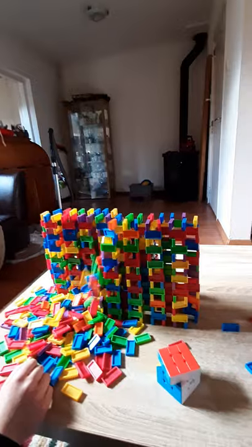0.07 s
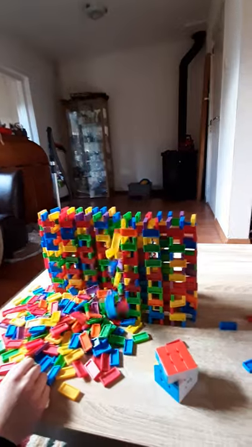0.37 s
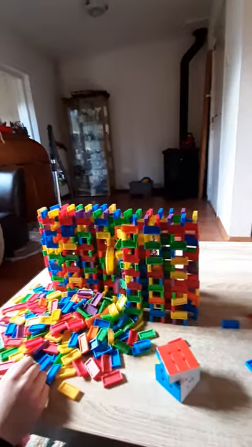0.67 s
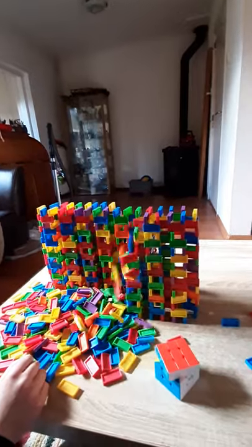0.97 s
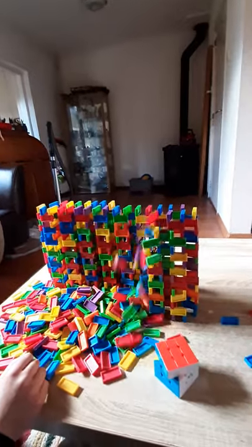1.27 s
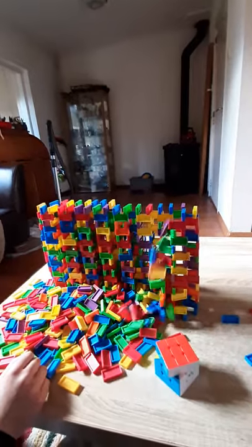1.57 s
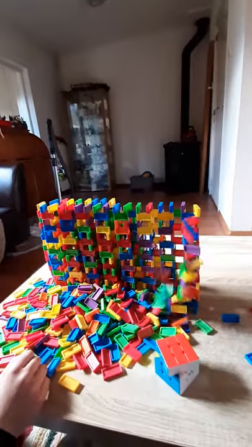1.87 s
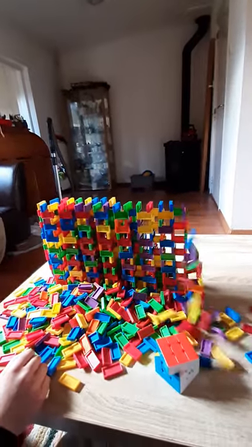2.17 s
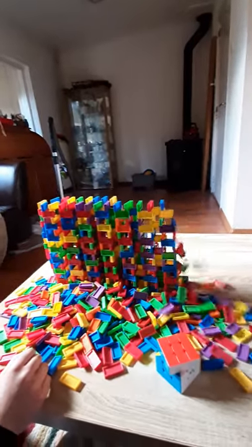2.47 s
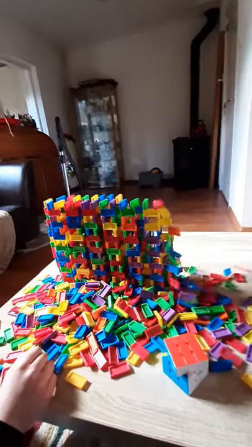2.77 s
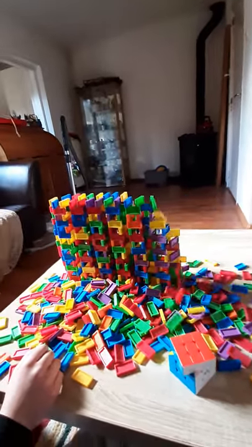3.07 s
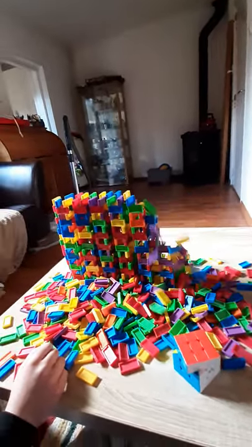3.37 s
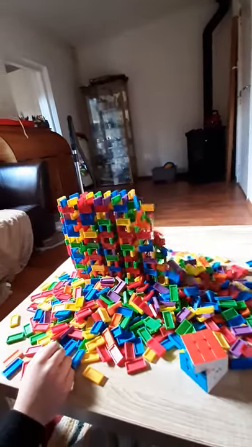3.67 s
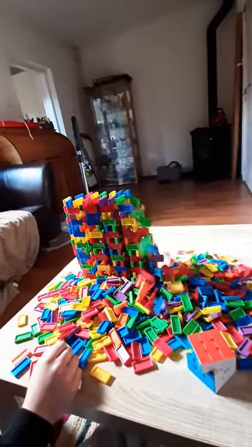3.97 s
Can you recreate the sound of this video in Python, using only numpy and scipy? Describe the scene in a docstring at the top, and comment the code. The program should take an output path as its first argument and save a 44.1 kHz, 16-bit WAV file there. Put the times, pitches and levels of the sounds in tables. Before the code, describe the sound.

Small plastic dominoes clatter close by for the whole four seconds, falling in surges of dense, bright clicks with loud clacks and pattering knocks on a wooden table. A few low thumps reach the microphone in the first 2.3 seconds. The clatter eases briefly around 3.2 seconds, then swells again at 3.5 and runs on. The living room adds a short echo.

```python
"""Small plastic dominoes tumble close by, as a wall of them falls column by column on a wooden table.
The pieces click against each other in dense runs; each click is a crack and a brief ring near 5 kHz.
Hard hits stand out as loud clacks, and pieces landing on the wood patter and knock.
A few low thumps reach the microphone, and a living room adds a short echo and a faint rumble."""
import sys
import numpy as np
from scipy import signal
from scipy.fft import rfft, irfft
from scipy.io import wavfile

SR = 44100
rng = np.random.default_rng(int(sys.argv[2]) if len(sys.argv) > 2 else 0)


def wav_out(sig):
    """Save sig, one row per channel (or a flat mono array), as 16-bit PCM at SR to the path in sys.argv[1]."""
    wavfile.write(sys.argv[1], SR, np.round(np.clip(np.atleast_2d(sig).T, -1, 1) * 32767).astype(np.int16))


N = 176400  # 4 seconds
PLASTIC_LIKENESS, WOOD_LIKENESS = 0.4, 0.93  # how alike left and right are, from 0 to 1

# Table levels are relative: the code adds its own gains. A fade_s is the time to die away by 60 dB.
# How hard the wall falls as columns give way. Columns: time_s, clatter_db, treble_db, patter_db
COLLAPSE = [(0.0, -17.5, -2, -30.5), (0.13, -25, -26, -36.5), (0.18, -17, -7, -32), (0.44, -20, -13, -30.5),
            (0.54, -25, -12, -38.5), (0.62, -17, -8, -31), (0.68, -30, -17, -38.5), (0.88, -26, -5.5, -34),
            (0.93, -16.5, -17, -36), (1.0, -24.5, -9, -33.5), (1.12, -19, -15.5, -35.5),
            (1.25, -21.5, -14, -36), (1.3, -18.5, -8.5, -35), (1.56, -16.5, -9.5, -28.5),
            (1.66, -28.5, -17.5, -36.5), (1.76, -17.5, -9.5, -29), (1.95, -16.5, -7.5, -32.5),
            (2.02, -20.5, -8.5, -32.5), (2.17, -19, -12, -32.5), (2.25, -23, -11, -32),
            (2.32, -15.5, -8, -31.5), (2.52, -22, -7.5, -32.5), (3.08, -20.5, -11.5, -34.5),
            (3.19, -28.5, -10.5, -37.5), (3.3, -30.5, -14, -38.5), (3.44, -20, -9.5, -29.5),
            (3.52, -16, -9, -26), (4.0, -19, -11, -29.5)]

def clatter(count=330, level_db=-0.74, rattle_s=0.012, free_fall_s=0.018, free_fall_db=-3.5):
    """Many pieces tumble over each other; each rattles briefly, overlapping its neighbours."""
    out = np.zeros((2, N))
    pieces = [domino(crack_db=0.3, crack_fade_s=0.021) for _ in range(count)]
    times, gain, hits = random_hits(column=1, per_s=440, spread_db=1.5)
    flicker_db = 2.5 * np.minimum(rng.standard_normal(len(times)), 1)
    brightness = amp(collapse_at(times, column=2) + 10 + flicker_db)
    which = (times / rattle_s + 3 * rng.random(len(times))).astype(int) % count
    # Loose pieces are in free fall just before a loud clack, so the clatter eases.
    falling = np.any([(times > s - free_fall_s) & (times < s) for s, _, _ in CLACKS], axis=0)
    gain *= amp(free_fall_db * falling)
    for k in hits:
        body, treble = pieces[which[k]]
        add(out, times[k], gain[k] * (body + brightness[k] * treble))
    return amp(level_db) * out


def random_hits(column, per_s, spread_db, slots=6000):
    """A harder fall brings more and stronger hits. Gives times, gains and the slots that sound."""
    times = (np.arange(slots) + rng.random(slots)) / slots * N / SR
    level = amp(collapse_at(times, column))
    chance = np.minimum(per_s * N / SR / slots * (level / level.mean()) ** 0.6, 1)
    strength = amp(spread_db * np.minimum(rng.standard_normal(slots), 1.6))
    gain = level * strength / np.sqrt(np.mean(strength ** 2) * chance * slots / N)
    return times, gain, np.flatnonzero(rng.random(slots) < chance)


# The tones a domino rings with. Columns: pitch_hz, level_db, fade_s, pitch_scatter_fraction
DOMINO_TONES = [(4595, -4, 0.048, 0.01), (4840, -1.5, 0.04, .008), (4997, -0.5, 0.038, 0.0098),
                (6118, -6.5, 0.043, 0.0088), (7020, -15, 0.069, 0.0234), (7550, -10.5, 0.037, 0.0226),
                (10380, -14, 0.024, 0.026), (10855, -13, 0.036, 0.014), (12190, -16.5, 0.016, 0.017),
                (13160, -17.5, 0.021, 0.022), (15340, -9.5, 0.007, 0.049)]
# The tone colour of plastic cracking against plastic. Columns: pitch_hz, level_db
CRACK_COLOUR = [(30, -41), (300, -4), (2000, -13), (2850, -15), (3400, -1), (4100, 1), (5400, 5.5),
                (8000, 2), (8600, -4.5), (9500, -12.5), (10500, -2.5), (11500, -9), (15700, -7.5)]

def domino(crack_db, crack_fade_s, size=2400, tone_spread_db=6, treble_hz=8600):
    """One click: the hit makes a noisy crack and sets the piece ringing. Gives body and treble."""
    t = np.arange(size) / SR
    hz, db, fade_s, scatter = np.transpose(DOMINO_TONES)[:, :, None]
    detune, strength = rng.standard_normal((2, len(hz), 1))
    tones = np.exp(2j * np.pi * hz * (1 + scatter * detune) * t) * fade(t, fade_s)
    tones *= amp(db + tone_spread_db * strength) / np.linalg.norm(tones.real, axis=1, keepdims=True)
    phases = np.exp(2j * np.pi * rng.random((2, len(hz), 1)))
    ring = (phases * tones).real.sum(1)
    burst = rng.standard_normal((2, size)) * fade(t, crack_fade_s)
    crack = unit(colour(burst, CRACK_COLOUR))
    click = unit(stereo(ring + amp(crack_db) * crack, PLASTIC_LIKENESS))
    keep_highs = 1 / (1 + (treble_hz / (np.fft.rfftfreq(size, 1 / SR) + 1)) ** 10)
    treble = irfft(rfft(click) * keep_highs, size)
    treble *= t < t[-1] / 2
    return click - treble, treble


# Loud hits of piece on piece. Columns: start_s, level_db, treble_db
CLACKS = [(0.032, -12, -10), (0.1477, -12, -14), (0.1644, -12.5, -4.5), (0.1962, -8.5, -26),
          (0.2303, -14.5, -2.5), (0.2813, -11.5, -25), (0.3804, -11.5, -7.5), (0.3974, -9, -10),
          (0.4179, -10.5, -9), (0.4657, -6, -7.5), (0.4881, -14, -5), (0.519, -11.5, -12),
          (0.5945, -13, -6), (0.7128, -16, -21), (0.7351, -17, -11), (0.7673, -14.5, -12.0),
          (0.7894, -15.5, -5.5), (0.8222, -19.5, -5), (0.8643, -15, -15.5), (0.9042, -13.5, 2.5),
          (0.9722, -15.5, -3), (1.0065, -18.5, -15), (1.0568, -8, -4), (1.1017, -11, -10),
          (1.1704, -9, -4.5), (1.1894, -11.5, -11), (1.238, -19, -19), (1.2685, -14, -6),
          (1.2891, -10.5, -7), (1.39, -11, -10), (1.431, -7.5, -7), (1.5394, -19, -11), (1.7109, -16, -2),
          (1.7305, -10.5, -10), (1.7986, -13, -6), (1.8608, -16, -16), (1.8816, -9.5, -30),
          (1.9041, -9, -22), (1.9138, -11, -18), (1.978, -14.5, -7), (2.0438, -24, -5), (2.083, -15, 1.5),
          (2.1043, -11.5, -7), (2.123, -12, -10), (2.156, -10, -9.5), (2.2278, -10.5, -6.5),
          (2.285, -16, 2), (2.309, -9.5, -10), (2.3262, -12, -8), (2.342, -16.5, -9), (2.427, -17, -5),
          (2.5846, -17.5, -11), (2.6816, -16, -5), (2.7131, -18, -1), (2.808, -13, 0.5),
          (2.8195, -18.5, -7), (2.9022, -20, -12), (2.9166, -14.5, -3.5), (2.9356, -17.5, -9),
          (3.0068, -16, -5), (3.0232, -12.5, -6), (3.1016, -20, -1), (3.2057, -24, -12), (3.2313, -27.5, 4),
          (3.306, -19, -22), (3.328, -21, -18), (3.3624, -13, -2), (3.4566, -16, -5.5), (3.4813, -15, -16),
          (3.5443, -10, -4.5), (3.634, -14, -1.5), (3.8116, -15, -18), (3.839, -9.5, -12), (3.9476, -26, 9)]

def clacks(boost_db=19.5, treble_boost_db=6.5, bounce_s=0.002, bounce_db=-1.5):
    """Two pieces hit hard with a short snap, then bounce twice, quickly and more softly."""
    out = np.zeros((2, N))
    for start, db, treble_db in CLACKS:
        for bounce in range(3):
            body, treble = domino(crack_db=0, crack_fade_s=0.012)
            snap = body + amp(treble_db + treble_boost_db) * treble
            delay = bounce_s * bounce * rng.uniform(0.75, 1.25)
            add(out, start + delay, amp(db + boost_db + bounce_db * bounce) * snap)
    return out


# Single pieces that hit the bare table. Columns: start_s, level_db
KNOCKS = [(0.1932, -31), (0.49, -35.5), (0.603, -33.5), (0.7145, -34.5), (0.7895, -25.5), (1.171, -32),
          (1.5437, -28), (1.711, -34), (1.7294, -35), (2.1037, -21), (2.4021, -26), (2.541, -27),
          (2.6023, -27), (2.7128, -27), (2.7838, -25), (2.8926, -28.5), (3.187, -37), (3.209, -31),
          (3.3118, -29), (3.3426, -25.5), (3.5266, -25)]

def table_landings(count=240, patter_boost_db=1, knock_boost_db=29):
    """Pieces rain on the table top: a patter with single louder knocks."""
    out = np.zeros((2, N))
    spots = [knock() for _ in range(count)]
    times, gain, hits = random_hits(column=3, per_s=340, spread_db=3.5)
    which = rng.integers(0, count, len(times))
    for k in hits:
        add(out, times[k], amp(patter_boost_db) * gain[k] * spots[which[k]])
    for start, db in KNOCKS:
        add(out, start, amp(db + knock_boost_db) * knock())
    return out


# The tone colour of the wooden table top when struck. Columns: pitch_hz, level_db
WOOD_COLOUR = [(30, -37), (70, -12), (140, -7.5), (195, 2), (235, -8), (300, -4), (450, -7), (670, 2),
               (850, -1.5), (1150, -2), (1540, 3.5), (1800, -3), (2050, 1), (2300, -2), (2900, -3.5),
               (4500, -0.5), (9000, -81)]

def knock(size=3600, blow_fade_s=0.0077, ring_fade_s=0.096, ring_db=-5):
    """A piece lands on wood: a short blow and a weaker ring of the board."""
    t = np.arange(size) / SR
    blow = unit(rng.standard_normal((2, size)) * fade(t, blow_fade_s))
    ring = unit(rng.standard_normal((2, size)) * fade(t, ring_fade_s))
    wood = colour(blow + amp(ring_db) * ring, WOOD_COLOUR)
    return unit(stereo(wood, WOOD_LIKENESS))


# Low thumps at the microphone. Columns: start_s, level_db, left_minus_right_db, push_s
THUMPS = [(0.033, -30.5, -9, 0.0019), (.3305, -13, 9, 0.00078), (0.4904, -12, 13, 0.00044),
          (0.52, -19.5, -14, 0.0015), (1.436, -23.5, 3, 0.00079), (1.733, -19, 18, 0.00063),
          (1.987, -22, 2, 0.00071), (2.046, -17.5, -19, .0008), (2.102, -12.5, -12, .0026),
          (2.308, -32.5, 0.5, 0.00093)]

def thumps(size=5000, thud_hz=338, thud_db=-5.5, bass_cut_hz=48, far_side_lag_s=0.0019):
    """A low thump at the microphone, mostly on one side: a short thud and a low push."""
    out = np.zeros((2, N))
    t = np.arange(size) / SR
    bass_cut = signal.butter(5, bass_cut_hz, "high", fs=SR, output="sos")  # makes the push wobble
    thud = amp(thud_db) * np.sin(2 * np.pi * thud_hz * t) * fade(t, fade_s=0.0046)
    for start, db, pan_db, push_s in THUMPS:
        push = signal.sosfilt(bass_cut, t / push_s * np.exp(-t / push_s))
        thump = amp(db) * (push / abs(push).max() + thud)
        gains = amp([pan_db / 2, -pan_db / 2])
        for side, gain in zip(np.eye(2), gains / gains.max()):
            add(out, start + far_side_lag_s * (gain < 1), gain * side[:, None] * thump)
    return out


# How long the room rings at each pitch. Columns: pitch_hz, fade_s
ROOM_FADES = [(150, 0.34), (1000, 0.26), (5000, 0.49), (15000, 0.41)]

def room_echo(sound, level_db=-7, gap_s=0.006):
    """The room answers with a short, smooth echo that lasts longest near 5 kHz."""
    t = np.arange(SR // 2) / SR
    noise = rng.standard_normal((2, len(t))) * (t > gap_s)
    hz, frame_s, spectrum = signal.stft(noise, SR, nperseg=256)
    spectrum *= fade(frame_s, at_pitch(ROOM_FADES, hz)[:, None])
    tail = signal.istft(spectrum, SR, nperseg=256)[1][:, :len(t)]
    return amp(level_db) * signal.fftconvolve(sound, unit(tail), axes=1)[:, :N]


def room_rumble(level_db=-56.5, band_hz=(90.5, 760.2)):
    """The faint, steady, low noise of the room."""
    band = signal.butter(2, band_hz, "band", fs=SR, output="sos")
    noise = signal.sosfilt(band, rng.standard_normal((2, N)))
    return amp(level_db) * np.sqrt(N) * unit(stereo(noise, WOOD_LIKENESS))


def amp(db):
    """Turns decibels into a gain to multiply by."""
    return 10 ** (np.asarray(db) / 20)


def fade(t, fade_s):
    """A gain that drops by 60 dB every fade_s seconds."""
    return amp(-60 * t / fade_s)


def unit(x):
    """Scales a sound so its channels have an average energy of 1."""
    return x / np.sqrt(np.mean(np.sum(x ** 2, -1)) + 1e-20)


def collapse_at(times, column):
    """Reads one column of COLLAPSE, gliding from row to row."""
    rows = np.array(COLLAPSE)
    return np.interp(times, rows[:, 0], rows[:, column])


def at_pitch(points, hz):
    """Reads a table by pitch, gliding evenly through each octave."""
    pitches, values = np.transpose(points)
    return np.interp(np.log(hz + 1), np.log(pitches + 1), values)


def add(mix, start_s, sound):
    """Mixes in a stereo sound at the given time."""
    part = mix[:, max(round(start_s * SR), 0):][:, :sound.shape[1]]
    part += sound[:, :part.shape[1]]


def colour(x, points, size=4096):
    """Turns each pitch up or down as a table says, with no ringing ahead of a hit."""
    log_gain = np.log(amp(at_pitch(points, abs(np.fft.fftfreq(size, 1 / SR)))))
    response = np.exp(np.conj(signal.hilbert(log_gain)))
    kernel = np.fft.ifft(response).real[:size // 2]
    return signal.fftconvolve(x, kernel[None], axes=1)[:, :x.shape[1]]


def stereo(pair, likeness, lag_s=0.00014, lag_spread_s=0.00004):
    """Makes two signals partly alike; the sound reaches the left side a little later."""
    other, right = pair
    lag = max(round((lag_s + lag_spread_s * rng.standard_normal()) * SR), 0)
    left = likeness * right + np.sqrt(1 - likeness ** 2) * other
    return np.array([np.pad(left, (lag, 0))[:len(left)], right])


# Which side is louder at each pitch. Columns: pitch_hz, left_minus_right_db
BALANCE = [(100, 2), (400, -2), (900, -2), (1500, -6), (2700, 0.5), (3600, -5), (5000, -3), (6600, -4),
           (7800, 5.5), (9300, -1.5), (11500, -3.5), (15500, -5)]

def scene():
    """Dominoes and table in the room, leaning to the right, with thumps and rumble underneath."""
    pieces = clatter() + clacks() + table_landings()
    in_room = pieces + room_echo(pieces)
    left = colour(in_room[:1], [(hz, db / 2) for hz, db in BALANCE])
    right = colour(in_room[1:], [(hz, -db / 2) for hz, db in BALANCE])
    return np.vstack([left, right]) + thumps() + room_rumble()


def record(dry, dip_at_s=1.7065, dip_half_width_s=0.0035, dip_db=-18, top_hz=15850):
    """The level dips briefly, peaks past full scale are clipped and the highest treble is cut."""
    t = np.arange(N) / SR
    dip = amp(dip_db * np.exp(-((t - dip_at_s) / dip_half_width_s) ** 2))
    treble_cut = signal.firwin(511, top_hz, window=("kaiser", 9), fs=SR)
    return signal.oaconvolve(np.clip(dry * dip, -1, 1), treble_cut[None], "same")


dry = scene()
out = record(dry)
wav_out(out)
```